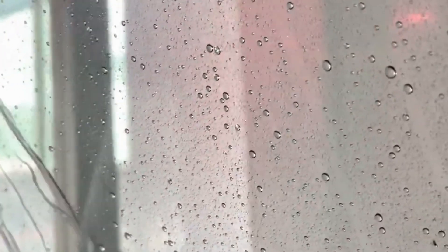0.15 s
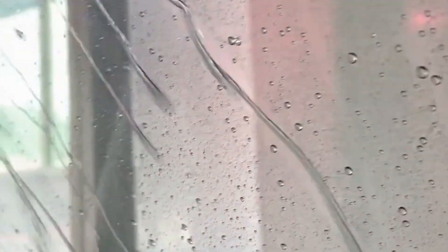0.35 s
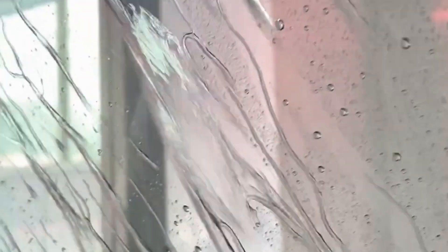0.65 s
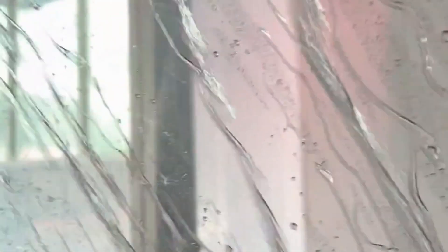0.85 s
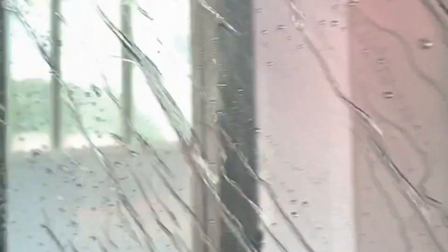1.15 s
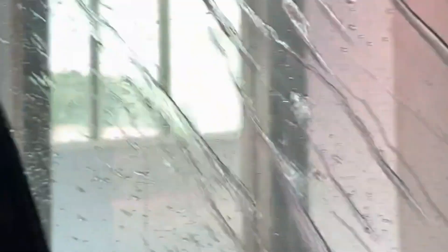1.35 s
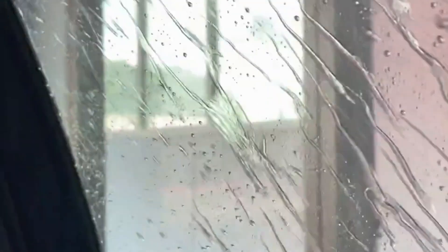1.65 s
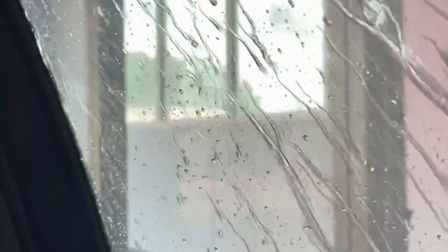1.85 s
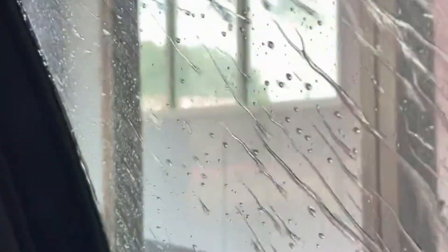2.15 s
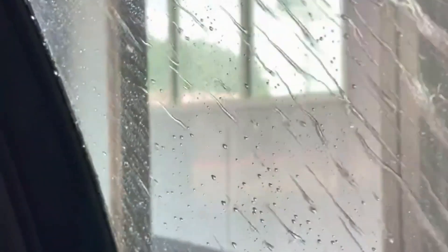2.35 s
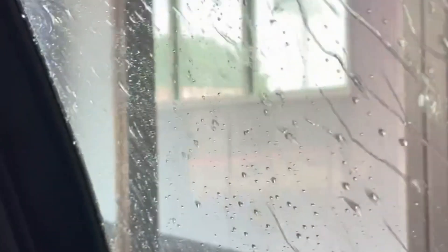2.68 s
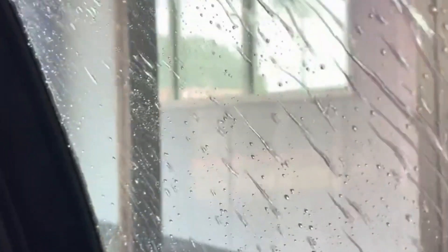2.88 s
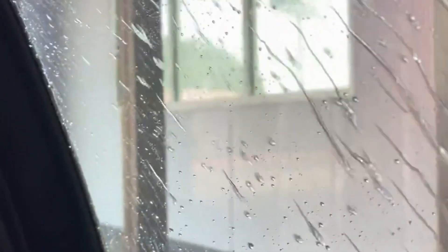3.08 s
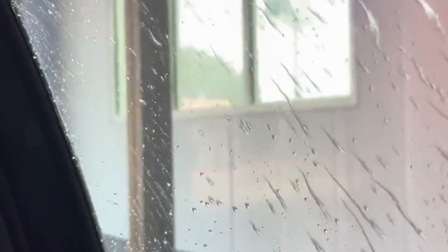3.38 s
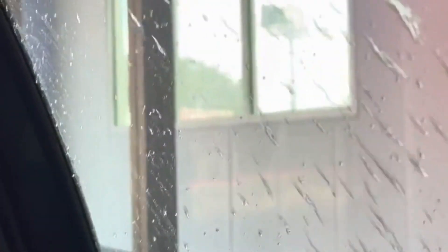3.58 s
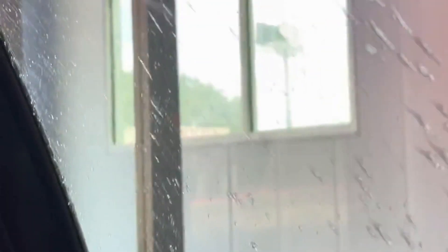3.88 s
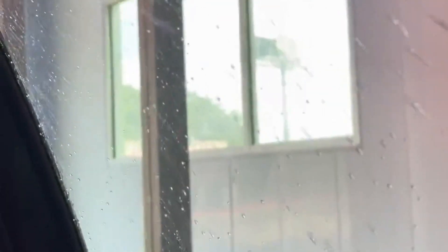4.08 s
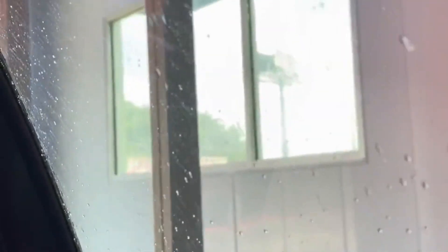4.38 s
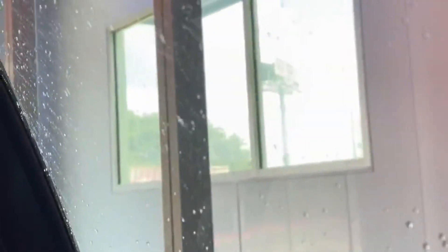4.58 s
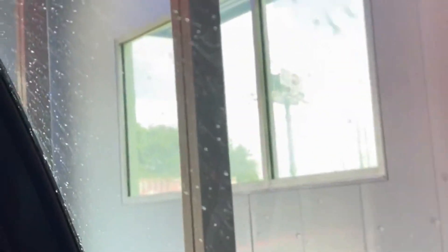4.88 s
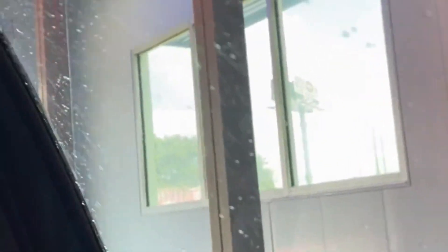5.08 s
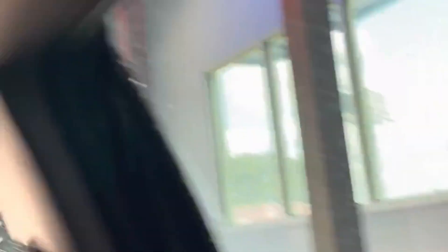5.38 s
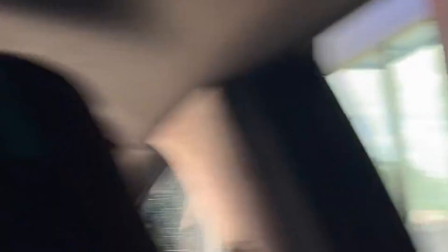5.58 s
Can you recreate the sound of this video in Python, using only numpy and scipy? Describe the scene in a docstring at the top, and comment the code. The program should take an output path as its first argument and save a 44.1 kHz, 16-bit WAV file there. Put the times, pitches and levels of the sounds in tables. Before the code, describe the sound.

Inside a closed car, powerful car-wash dryers roar and boom, growing heavier as air jets drum the body and fine water hisses on glass.

```python
"""Car-wash dryer from inside the car

Two microphones in the closed cabin of a car creeping under the nozzles. Blowers rush as filtered noise with
faint whines and make the cabin boom; jets beat on the body as noise that grows until the car is under them.
Short sine drones, some gliding, stand out of the rumble. Mist and drops, noise and random clicks, hiss over
the side window, and an early swish of water is swept off it."""
import sys
import numpy as np
from scipy import signal
from scipy.fft import rfft, irfft, next_fast_len
from scipy.io import wavfile
from scipy.ndimage import uniform_filter1d, minimum_filter1d, map_coordinates

SR = 44100
rng = np.random.default_rng(int(sys.argv[2]) if len(sys.argv) > 2 else 0)


def transcribe(u):
    """Save the signal u as a 16-bit wav file named by the first command-line argument.

    u: samples, shape (n,) or (channels, n), limited to [-1, 1]; the rate is SR.
    q: integer samples, one column per channel.
    """
    v = np.clip(np.atleast_2d(u).T, -1, 1)
    q = np.round(v * 32767).astype(np.int16)
    wavfile.write(sys.argv[1], SR, q)


N = 253134  # samples

# Source levels are in dB ahead of the compressor and limiter in record().


def amp(db):
    """Decibels to gain."""
    return 10 ** (np.asarray(db) / 20)


def unit(x):
    """x scaled to rms 1."""
    return x / np.sqrt(np.mean(x ** 2) + 1e-20)


def seconds():
    """The time of every sample, in seconds."""
    return np.arange(N) / SR


def since(start_s):
    """Seconds since a moment, 0 before it."""
    return np.maximum(seconds() - start_s, 0)


def wobble(rate):
    """A smooth random curve through rate knots a second."""
    knots = rng.standard_normal(int(N * rate / SR) + 4)
    return map_coordinates(knots, [np.arange(N) * rate / SR])


def swells(rows):
    """Bell-shaped level changes in dB; a length spans the bell between its 1/e points."""
    t = seconds()
    return sum(db * np.exp(-(2 * (t - middle_s) / length_s) ** 2) for middle_s, length_s, db in rows)


def along(points, hz, axis=1):
    """One column of a table read on a log-frequency axis."""
    table = np.transpose(points)
    return np.interp(np.log(hz + 1), np.log(table[0] + 1), table[axis])


def shape(spectrum):
    """The gain of a spectrum as a function of frequency."""
    return lambda hz: amp(along(spectrum, hz))


def filtered(x, response):
    """x times a complex response of frequency."""
    size = next_fast_len(N + SR // 2)
    hz = np.fft.rfftfreq(size, 1 / SR)
    return irfft(rfft(x, size) * response(hz), size)[..., :N]


def white_pair():
    """Two unrelated steady white noises."""
    return rng.standard_normal((2, N))


def turbulence(patchy_db):
    """Two unrelated white noises whose strength drifts in patches of time and frequency."""
    z = signal.stft(white_pair(), nperseg=512)[2]
    field = rng.standard_normal(z.shape[1:])
    field = uniform_filter1d(field, size=4, axis=0)  # smooth over frequency
    field = uniform_filter1d(field, size=4, axis=1)  # smooth over time
    patchy = z * amp(patchy_db * unit(field))
    return signal.istft(patchy, nperseg=512)[1][:, :N]


def reflections(hz):
    """Echoes between the windows leave a fine, still midrange ripple; the seats soak up the highest ones."""
    spacing_hz, depth_db, from_hz, to_hz = 24, 2.0, 600, 6000
    knots = rng.standard_normal(int(hz[-1] / spacing_hz) + 4)
    ripple = map_coordinates(knots, [hz / spacing_hz])
    midrange = hz / (hz + from_hz) / (1 + (hz / to_hz) ** 2)
    return amp(depth_db * midrange * ripple)


# The cabin's sound field at the left and right microphones:
# (frequency [Hz], likeness [0-1], left lead [rad], left minus right level [dB])
MICROPHONES = [(60, 0.9998, 0.0, 0.0), (130, 0.998, 0.01, 0.2), (220, 0.986, 0.06, 0.4),
               (320, 0.92, 0.21, 1.1), (440, 0.8, 0.25, 3.2), (530, 0.75, 0.2, 3.4), (680, 0.32, 2.3, 1.3),
               (770, 0.22, 1.2, 2), (860, 0.3, -1.2, 4.8), (1020, 0.12, -1.4, 2.2), (1180, 0.32, -0.8, 3.6),
               (1380, 0.36, -1.15, 1.2), (1580, 0.82, -0.15, -0.3), (2000, 0.8, 0.37, -0.1),
               (2400, 0.42, 1.1, -0.5), (3000, 0.26, 1.2, 1.2), (3800, 0.57, 0.65, -1.2),
               (4300, 0.52, 1.45, -0.9), (4850, 0.72, 3.14, -0.8), (5900, 0.92, 6.28, 0.0),
               (7300, 0.78, 7.8, 0.0), (8900, 0.97, 9.42, 0.0), (11500, 0.77, 12.5, 0.1)]


def in_cabin(pair, colour):
    """Two unrelated signals, coloured and blended into what the two microphones pick up; rms 1."""
    def blend(hz):
        turn = np.arccos(np.clip(along(MICROPHONES, hz), 0, 1)) / 2
        return np.array([np.cos(turn), np.sin(turn)])

    def left_right(hz):
        # each side takes half of the lead and half of the level difference
        level = amp(along(MICROPHONES, hz, axis=3) / 2)
        left = level * np.exp(.5j * along(MICROPHONES, hz, axis=2))
        return np.array([left, 1 / left])

    shared, apart = filtered(pair, lambda hz: colour(hz) * reflections(hz) * blend(hz))
    return unit(filtered(np.array([shared + apart, shared - apart]), left_right))


# Colour of the cabin's low boom: (frequency [Hz], relative density [dB per Hz])
BOOM_SPECTRUM = [(20, -22), (33, -12.5), (45, -10.5), (58, 0), (72, 0.5), (100, -6.5), (150, -15.5),
                 (210, -9.5), (300, -17), (450, -36), (900, -87.5)]


def cabin_boom(level_db=-16.5, swell_from_s=4.32, swell_db_per_s=3.6):
    """The closed cabin booms at its lowest air resonances, driven by the blowers; steady, then swelling."""
    boom_db = level_db + swell_db_per_s * since(swell_from_s)
    return amp(boom_db) * in_cabin(white_pair(), shape(BOOM_SPECTRUM))


def nearness(arrive_s=3.54):
    """0 at the start, rising steadily to 1 under the nozzles, where the car stays in the jets."""
    return np.minimum(seconds() / arrive_s, 1)


# Colour of the jets on the body: (frequency [Hz], relative density [dB per Hz])
ROAR_SPECTRUM = [(45, -32.5), (65, -9), (85, -3.5), (125, -0.5), (160, -1.2), (220, -8.5), (270, -13.5),
                 (315, -8), (370, -14), (430, -16), (530, -17), (580, -23.5), (615, -21.5), (665, -30.5),
                 (770, -30.5), (950, -33.5), (1100, -41.5), (2200, -86.5)]
# Surges against the doors and glass: (middle time [s], length [s], gain [dB])
JET_GUSTS = [(.6, .12, 3.5), (1.68, 0.19, 1.5), (2.35, 0.12, 2.5), (2.82, 0.078, 2), (3.53, 0.15, 1.8),
             (3.87, 0.092, 3), (4.95, .1, 2.5), (5.3, .09, 3), (5.67, 0.12, 4.5)]


def jet_roar(split_hz=245, buffet_db=1.05):
    """The jets drum on the wide roof at low pitch and on the stiffer doors and glass higher up."""
    roof_db, roof_gain_db = -13, 10.5  # level under the nozzles, rise on the way there
    glass_db, glass_gain_db = -19.5, 9
    ease_from_s, ease_db_per_s = 4.6, 1.5  # late on the jet slides off the glass
    away = 1 - nearness()
    low_share = lambda hz: 1 / (1 + (hz / split_hz) ** 8)
    roof_colour = lambda hz: shape(ROAR_SPECTRUM)(hz) * np.sqrt(low_share(hz))
    glass_colour = lambda hz: shape(ROAR_SPECTRUM)(hz) * np.sqrt(1 - low_share(hz))
    roof = in_cabin(white_pair(), roof_colour)
    glass = in_cabin(turbulence(patchy_db=2.1), glass_colour)
    buffet = buffet_db * wobble(50)  # eddies make the jet flap
    roof_level = roof_db - roof_gain_db * away
    glass_level = glass_db - glass_gain_db * away - ease_db_per_s * since(ease_from_s)
    glass_level = glass_level + swells(JET_GUSTS) + buffet
    return amp(roof_level) * roof + amp(glass_level) * glass


def air_flutter(slow_share=0.54, mid_share=0.7):
    """Quick changes in the strength of the airflow, rms 1."""
    return unit(slow_share * wobble(14) + mid_share * wobble(60) + wobble(120))


# Colour of the fans' rush: (frequency [Hz], relative density [dB per Hz])
RUSH_SPECTRUM = [(200, -36), (450, -3.5), (620, -2), (670, -4), (780, -2.5), (950, -11), (1040, -8),
                 (1220, -9.5), (1380, -9.5), (1600, -13.5), (1900, -15.5), (2500, -17), (3000, -19.5),
                 (4000, -23), (6000, -28.5), (11000, -47)]
# Faint whines of the blowers and nozzles: (centre [Hz], full width at -6 dB [Hz], level [dB])
BLOWER_WHINES = [(716, 22, -42), (1590, 62, -53), (2896, 38, -57.5), (6100, 70, -72.5)]


def blowers(flutter, level_db=-31, flutter_db=0.76):
    """Fans at constant speed: broad turbulent rush with a few narrow whines, made as bands of noise."""
    rush = in_cabin(turbulence(patchy_db=1.45), shape(RUSH_SPECTRUM))
    out = amp(level_db + flutter_db * flutter) * rush
    for centre_hz, width_hz, db in BLOWER_WHINES:
        line = lambda hz: 1 / (1 + (2 * (hz - centre_hz) / width_hz) ** 2)
        out = out + amp(db) * in_cabin(white_pair(), line)
    return out


# Colour of water on the glass: (frequency [Hz], relative density [dB per Hz])
SPRAY_SPECTRUM = [(1800, -25), (3800, -0.5), (4850, -4.8), (5200, -2.8), (5600, -4.8), (7000, -2),
                  (8000, 0.5), (9000, -1), (10500, -7), (12000, -24.5)]
# Sheets of water blown over the window swell the spray: (middle time [s], length [s], gain [dB])
WATER_SHEETS = [(.1, .3, 2), (.38, .1, 3), (.75, 0.63, 1.8), (3.03, 0.15, 4.5), (3.42, .08, 1.5)]


def spray(flutter, flutter_db=1.2, spatter_db=1.55):
    """Mist hisses and drops tick on the glass, in uneven bursts that partly follow the flapping air."""
    base_db, mist_db, drops_db = -55.5, 4, -1  # mist and drops are relative to the base
    dry_from_s, dry_db_per_s = 3.93, 3.5  # the glass begins to dry
    drop_rate, size_spread_db = 1000, 3  # drops per second in each of the two signals
    spray_db = base_db + swells(WATER_SHEETS) - dry_db_per_s * since(dry_from_s)
    spray_db = spray_db + spatter_db * wobble(110) + flutter_db * flutter
    mist = in_cabin(turbulence(patchy_db=3.0), shape(SPRAY_SPECTRUM))
    lands = rng.random((2, N)) < drop_rate / SR
    sizes = amp(size_spread_db * np.minimum(rng.exponential(size=(2, N)), 4.5))
    clicks = lands * sizes * rng.choice([-1, 1], (2, N))
    drops = in_cabin(clicks, shape(SPRAY_SPECTRUM))
    return amp(spray_db) * (amp(mist_db) * mist + amp(drops_db) * drops)


# The first water swept off the window, a single row:
# (middle time [s], length between 1/e points [s], centre [Hz], width of two standard deviations [Hz], level [dB])
WATER_SWISH = (0.3, 1.0, 3700, 1700, -51)


def swish():
    """The first jets sweep the standing water across the glass: one bell-shaped swell of banded noise."""
    middle_s, length_s, centre_hz, width_hz, db = WATER_SWISH
    colour = lambda hz: np.exp(-(2 * (hz - centre_hz) / width_hz) ** 2 / 2)
    swell = np.exp(-(2 * (seconds() - middle_s) / length_s) ** 2)
    level = amp(db + 2.4 * wobble(13.6))
    return level * swell * in_cabin(turbulence(patchy_db=1.5), colour)


# Short drones in the rumble:
# (middle time [s], length [s], pitch at the middle [Hz], glide [Hz per s], level at the middle [dB])
RUMBLE_DRONES = [(0.123, .18, 66.2, -2, -21), (.39, .24, 68.83, 18, -14), (0.594, .22, 195.4, -130, -24),
                 (.8, .6, 58, 0.5, -22), (1.11, 0.19, 68, 0, -18), (1.284, 0.18, 221.8, -1, -21.5),
                 (1.457, 0.49, 158.8, 60, -20), (1.7, 0.49, 57.77, 4, -17.5), (2.174, 0.18, 100.8, 71, -14),
                 (2.596, .2, 76, 80.5, -14.5), (2.726, 0.21, 106, 29.5, -15.5),
                 (2.936, 0.18, 80.7, 0, -11.5), (3.303, .6, 75.9, -20, -17), (3.166, 0.7, 157.6, -5, -13.5),
                 (3.701, 0.38, 159.6, -100, -23), (3.828, 0.257, 123.6, -200, -10),
                 (4.247, 0.35, 98.3, -29, -11.5), (4.32, 0.19, 150.2, -150, -15.5),
                 (4.63, 0.53, 127.7, -70.5, -13), (4.97, 0.25, 195.2, -0.5, -17),
                 (5.181, .24, 129.5, 30.5, -10.5), (5.5, 0.8, 77, 14, -13.5)]


def drones(waver=0.0149, throb_db=1):
    """Short drones, unsteady in pitch and strength, stand out of the rumble at listed times, often overlapping."""
    out = np.zeros(N)
    for middle_s, length_s, pitch_hz, glide, db in RUMBLE_DRONES:
        t = np.clip(seconds() - middle_s, -length_s / 2, length_s / 2)
        swell = np.cos(np.pi * t / length_s)  # silent at both ends
        pitch = (pitch_hz + glide * t) * (1 + waver * wobble(16))
        cycles = np.cumsum(pitch) / SR + rng.random()
        tone = np.sqrt(2) * np.sin(2 * np.pi * cycles)  # rms 1
        out += amp(db + throb_db * wobble(14)) * swell * tone
    return out


# Brief dips of the whole hiss: (middle time [s], length [s], gain [dB])
HISS_DIPS = [(1.47, 0.035, -3.5), (2.685, .015, -3.5), (3.41, .012, -3), (4.75, .03, -3), (5.32, .03, -2.5)]


def scene():
    """All the moving air and water at the microphones; rush and spray share one flutter."""
    flutter = air_flutter()
    hiss = amp(swells(HISS_DIPS)) * (blowers(flutter) + spray(flutter) + swish())
    return cabin_boom() + jet_roar() + hiss + drones()


def levelled(x, threshold_db=-11, squeeze=0.31, window_s=.1):
    """A bass compressor evens out the surges of the rumble; everything higher passes untouched."""
    bass = filtered(x, lambda hz: 1 / (1 + (hz / 230) ** 6))
    window = np.hanning(int(2 * window_s * SR))
    smooth = lambda v: signal.fftconvolve(v, window, "same")
    power = np.abs(smooth(np.mean(bass ** 2, axis=0)))
    level = np.sqrt(power / smooth(np.ones(N)))
    gain = (level / amp(threshold_db)) ** -squeeze
    return x + bass * (gain - 1)


def record(dry, drive_db=0.5):
    """Compressor, then a fast soft-knee limiter on the bass peaks; the treble passes up to a band limit."""
    ceiling, knee, bass_hz, top_hz = .9, 7, 1000, 12000
    driven = amp(drive_db) * levelled(dry)
    bass = filtered(driven, lambda hz: 1 / (1 + (hz / bass_hz) ** 4))
    peak = np.abs(bass).max(axis=0)
    needed = (1 + (peak / ceiling) ** knee) ** (-1 / knee)
    gain = uniform_filter1d(minimum_filter1d(needed, size=400), size=400)  # hold, then smooth
    treble = driven - bass
    return filtered(bass * gain + treble, lambda hz: hz < top_hz)


dry = scene()
out = record(dry)
transcribe(out)
```